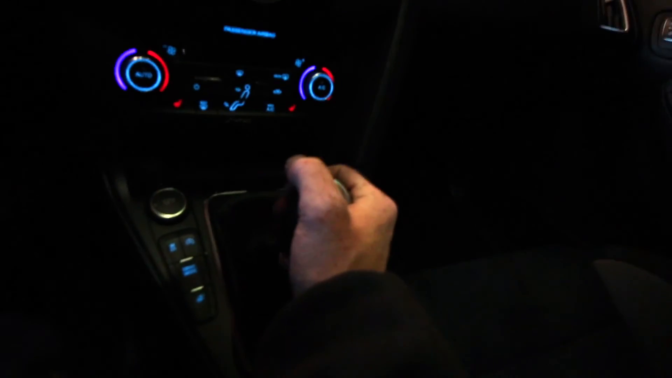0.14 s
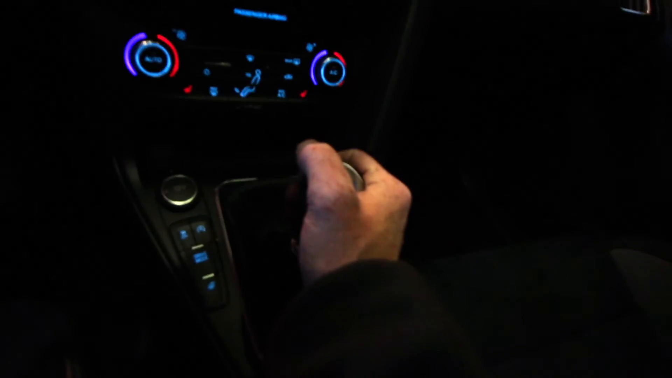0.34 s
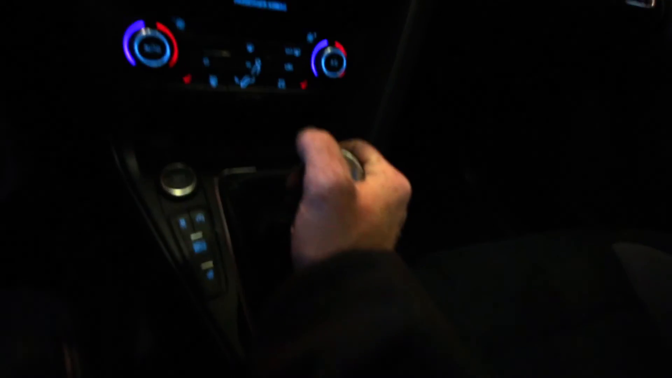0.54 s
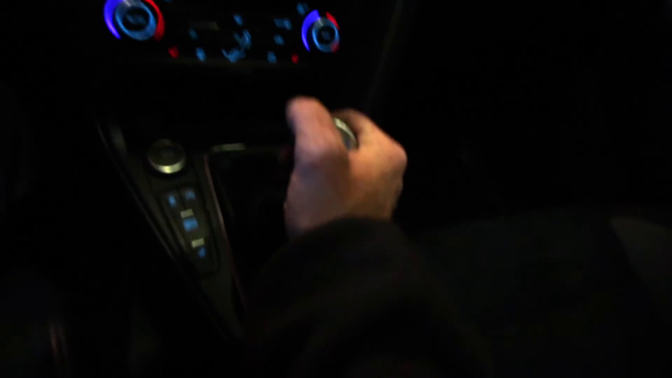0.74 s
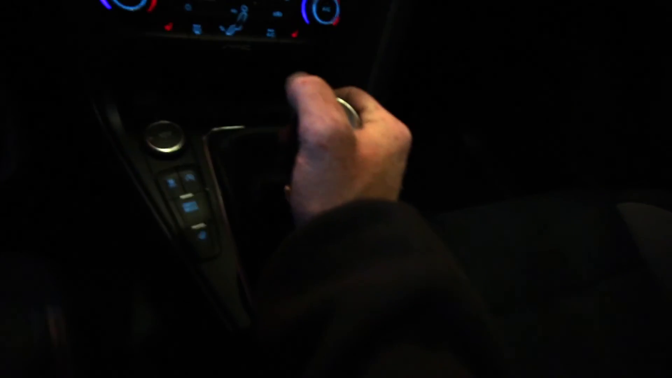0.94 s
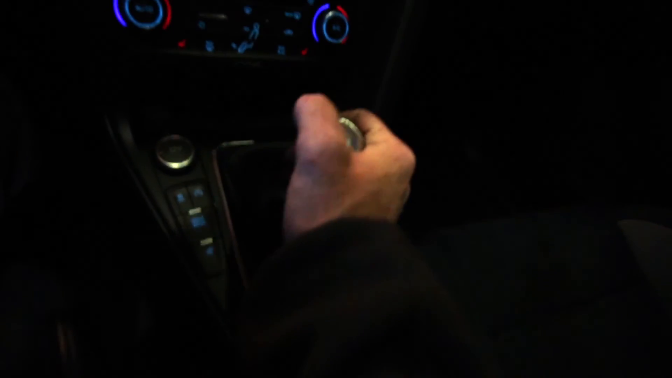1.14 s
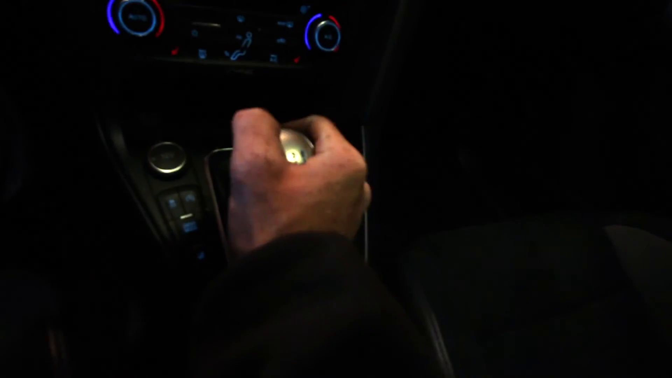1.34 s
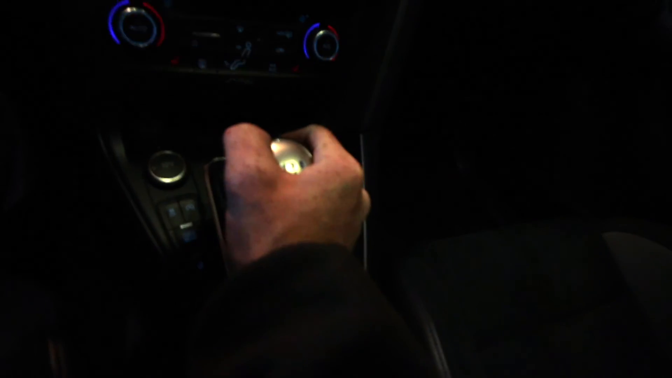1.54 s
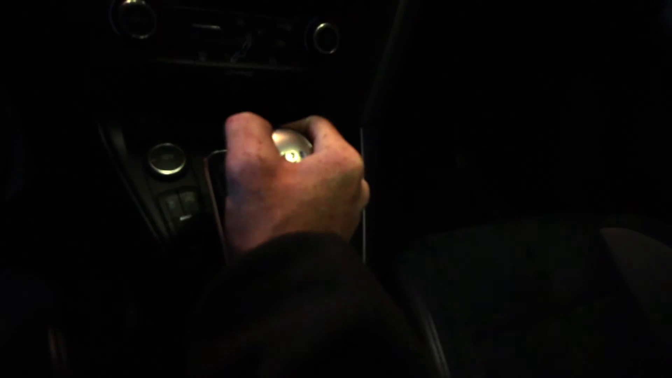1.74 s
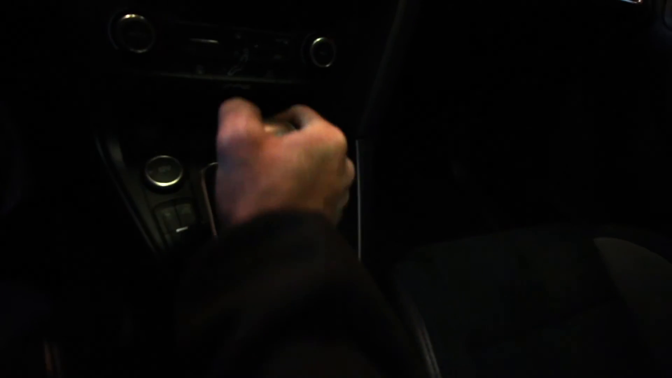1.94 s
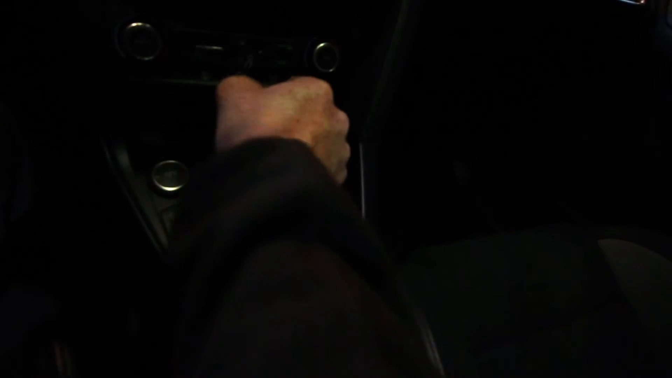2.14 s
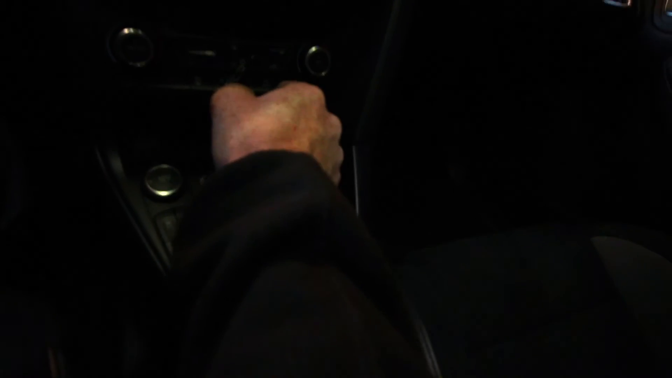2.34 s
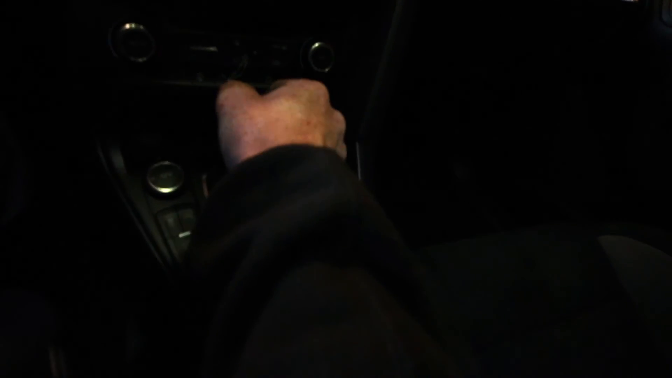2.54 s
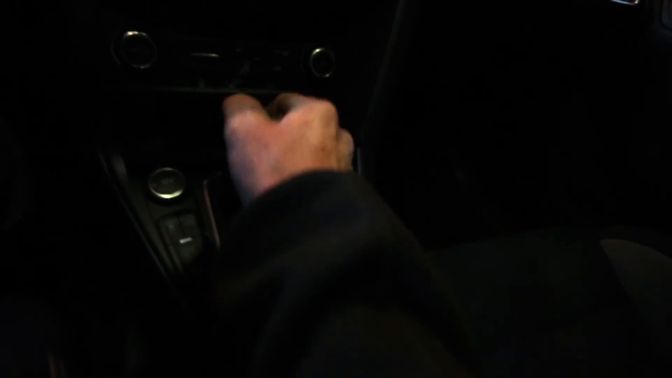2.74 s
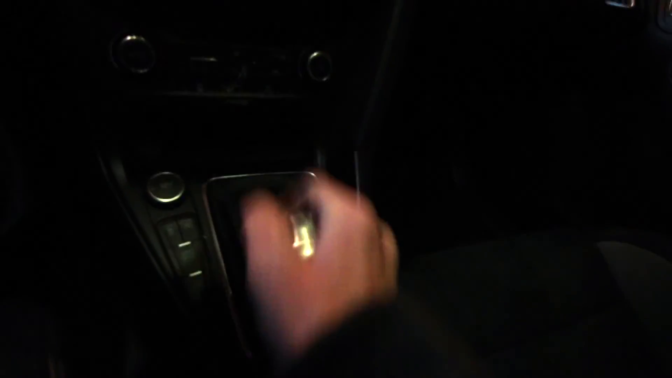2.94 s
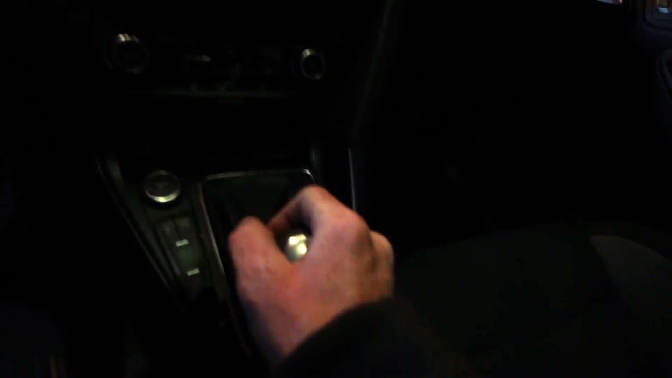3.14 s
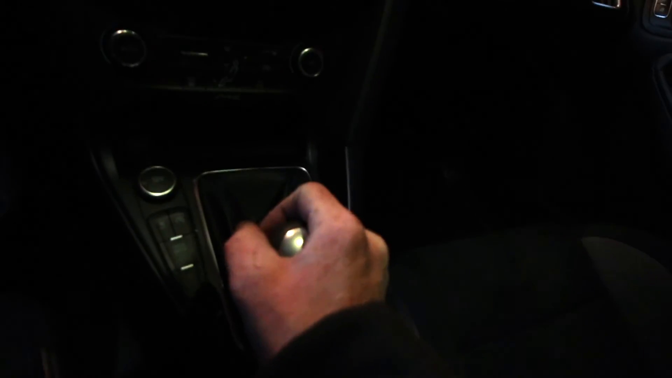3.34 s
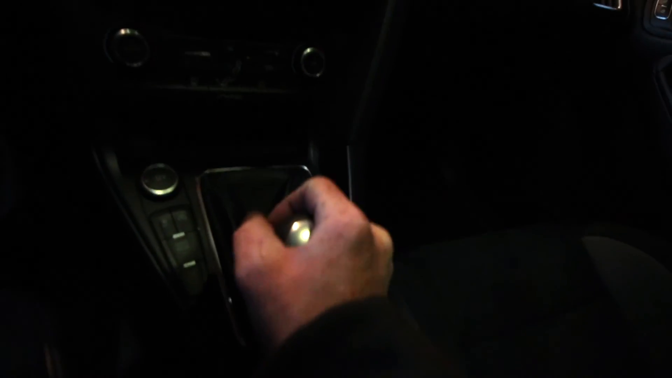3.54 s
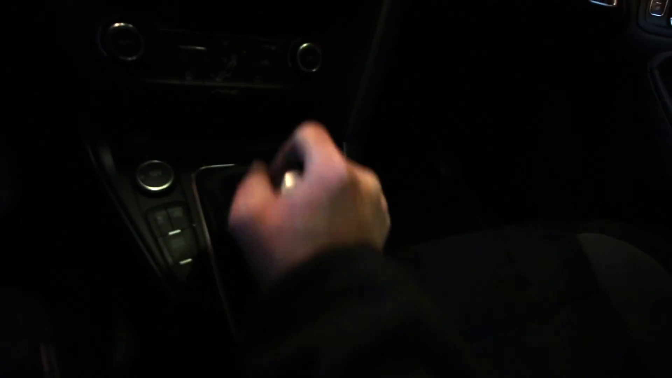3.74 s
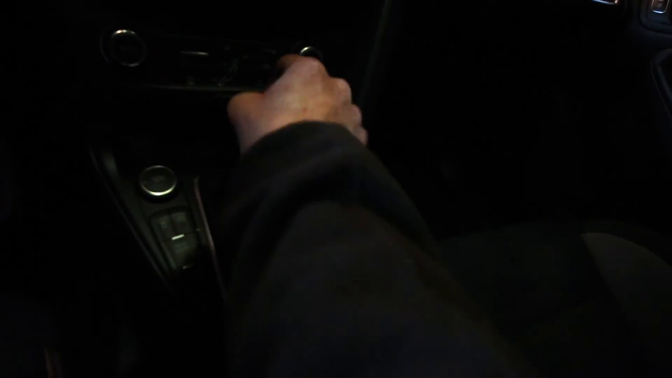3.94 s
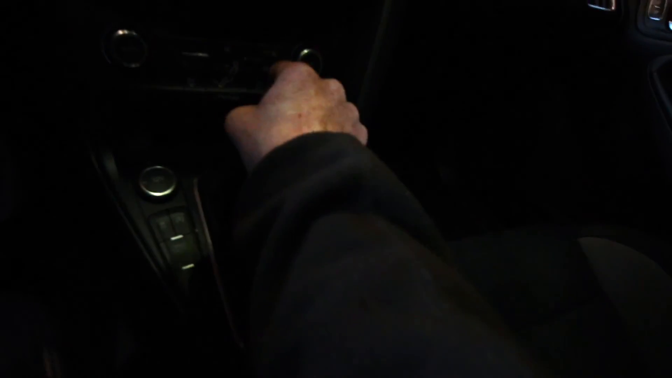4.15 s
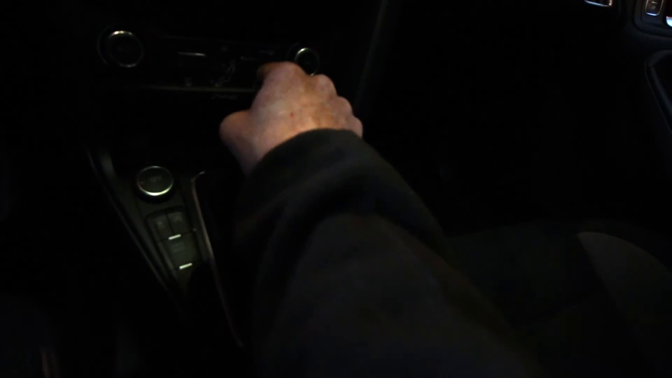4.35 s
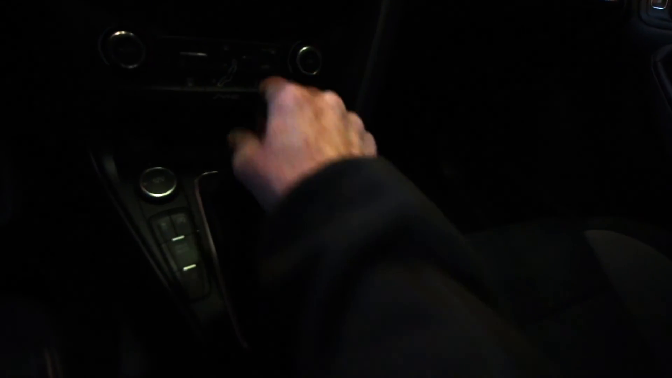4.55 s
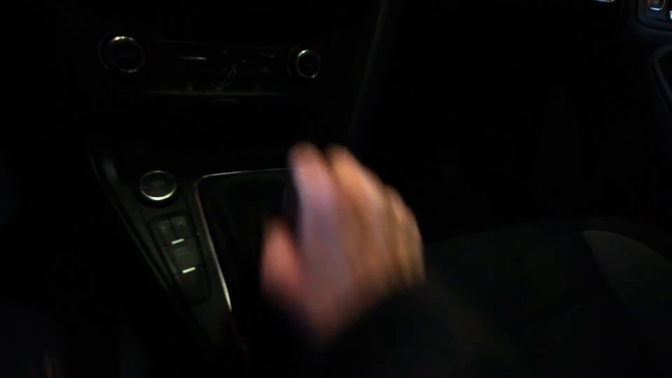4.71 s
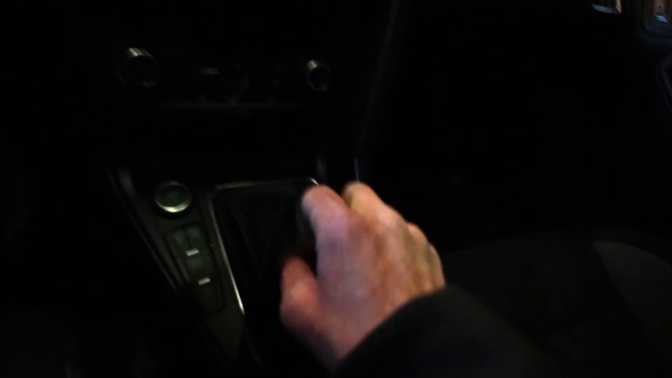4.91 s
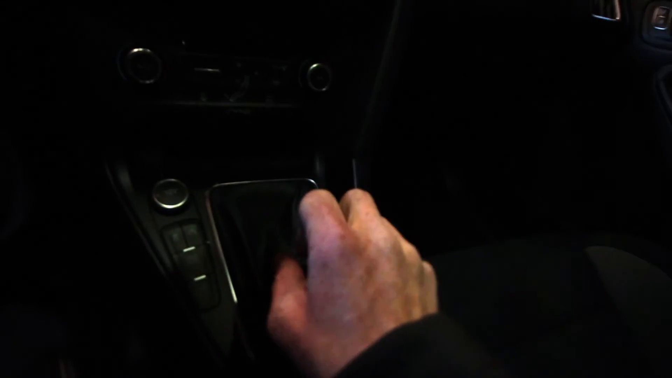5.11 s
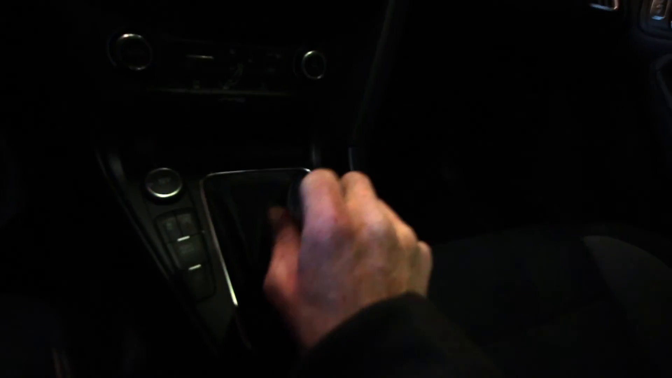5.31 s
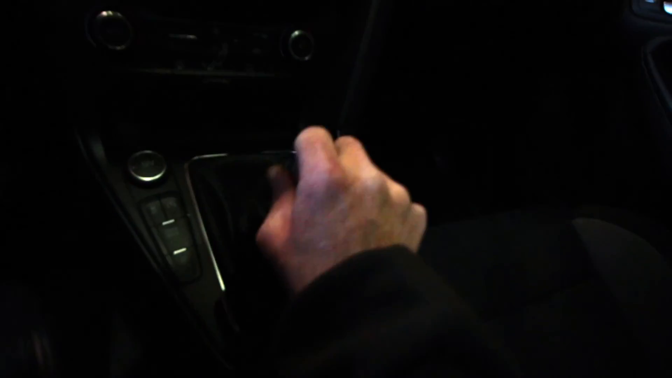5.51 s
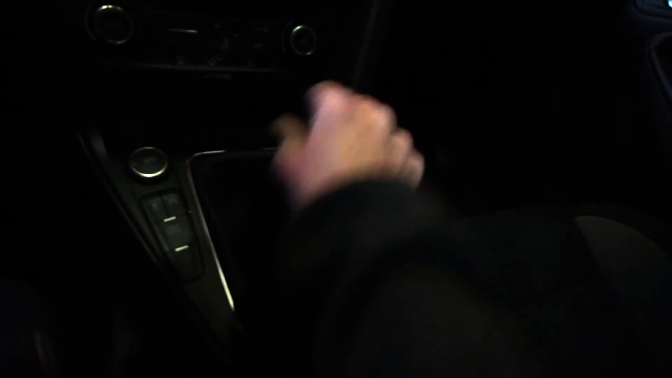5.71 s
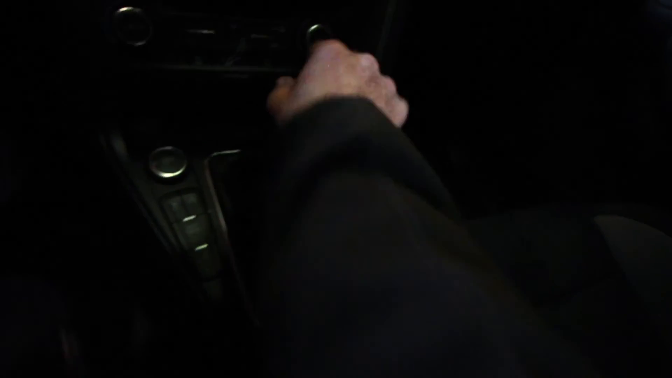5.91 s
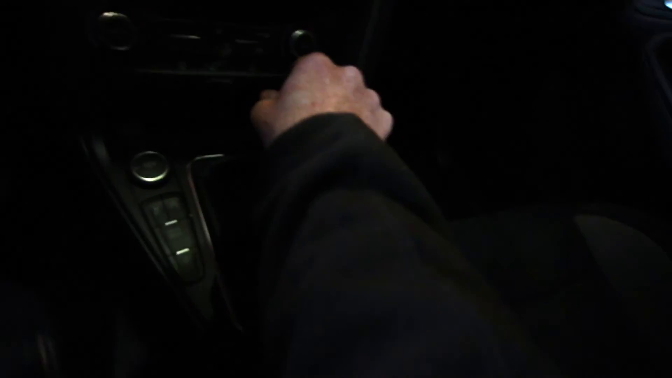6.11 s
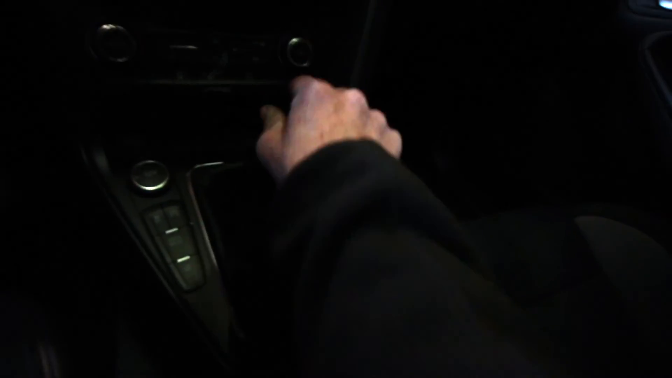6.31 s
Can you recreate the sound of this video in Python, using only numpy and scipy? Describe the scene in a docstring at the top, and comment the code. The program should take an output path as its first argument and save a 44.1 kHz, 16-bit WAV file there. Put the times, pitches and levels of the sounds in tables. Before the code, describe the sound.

A manual gear lever is heard up close in a small, echoless car cabin. It first knocks and clicks lightly in neutral, then clunks into gear five times at roughly one-second intervals. Each shift catches, thumps the console and clacks the linkage, with a dull rubbery shudder. Coat cloth and the crinkly cover around the lever rustle softly between the hits, while a quiet rumble sits underneath.

```python
"""First come a quiet rumble and the slide of a coat sleeve inside a parked car, then soft bumps and clicks
as a hand wiggles the gear lever in neutral. Five shifts follow, about a second apart. In each, the lever
hits its spring catch, its guide (the gate) and its end stop, thumping the console and clacking the rods
that link it to the gearbox, which ring on faintly. The lever shudders on its rubber mounts, the sleeve
rustles, and the boot (the soft cover around the lever) swishes as it folds."""
import sys
import numpy as np
from scipy import signal
from scipy.fft import rfft, irfft, next_fast_len
from scipy.io import wavfile
from scipy.ndimage import map_coordinates

SR = 44100
rng = np.random.default_rng(int(sys.argv[2]) if len(sys.argv) > 2 else 0)


def generate_wav(signal):
    """Clip the signal to [-1, 1] and save it as 16-bit WAV at the path in sys.argv[1]."""
    frames = np.transpose(np.atleast_2d(signal))
    scaled = np.clip(frames, -1, 1) * 32767
    pcm = np.round(scaled).astype(np.int16)
    wavfile.write(sys.argv[1], SR, pcm)


N = 280961

# Table levels are relative: the functions set how loud each layer ends up.
# Spectra, or how strong a noise is from low to high pitch: f/Hz, level/dB
CABIN_SPECTRUM = [(15, -7), (35, -8), (100, -12), (230, -14.5), (420, -21), (700, -24), (950, -26),
                  (1100, -30.5), (1280, -25), (1600, -34.5), (1830, -29), (2020, -36), (3400, -38.5),
                  (5000, -43), (15600, -45.5)]  # steady background
RUMBLE_SPECTRUM = [(15, -37), (25, -32), (36, 6), (50, 6), (90, 7), (130, 4), (200, -3.5), (400, -50.5)]  # the car's body
SLIDE_SPECTRUM = [(240, -6), (400, -6), (438, -3.5), (880, -5), (949, -6), (1230, 0.5), (1330, -4),
                  (2830, -9), (3660, -7), (4530, -15), (15000, -34.5)]  # sliding sleeve
RUSTLE_SPECTRUM = [(150, 13), (450, 3.5), (750, -1.5), (1300, 0), (2100, -4), (2700, -1.5), (3600, -4),
                   (4400, -15), (7000, -17), (15000, -33)]  # rustling sleeve
CRACK_SPECTRUM = [(300, 9), (900, 1), (1800, 9.5), (2800, -4.5), (3700, -6), (4800, -9.5), (8000, -44),
                  (15000, -43)]  # lever parts hitting and scraping
RING_SPECTRUM = [(200, 10), (480, 9), (800, 1), (1300, 3), (2100, -0.5), (2750, 4), (3100, 0.5), (3550, 4),
                 (4300, -8.5), (6500, -20), (15000, -69)]  # springs and cables
SNAP_SPECTRUM = [(300, 10.5), (900, 0.5), (1600, -6.5), (2600, -1), (3600, -11), (5200, -29), (15000, -46)]  # snapping plastic
BOOT_SPECTRUM = [(1500, -8), (4000, -0.5), (6500, -2.5), (10500, -2), (13000, -5), (15500, -9.5)]  # folding boot

# Modes, the tones a struck part rings with: f/Hz, level/dB, time to fade by 60 dB/s
CONSOLE_MODES = [(71.6, -18.5, 1), (101.6, -2, 0.18), (121.2, -1, 0.38), (165.6, 2, 0.14),
                 (192.9, -3.5, 0.18), (262.6, 3.5, 0.12), (313.5, -5.5, 0.16), (345, -1.5, 0.083)]  # centre console and cabin
LINKAGE_MODES = [(409.4, -8.5, 0.17), (459, 1.5, 0.069), (574, 4.5, 0.03), (649.4, 3.5, 0.08),
                 (772, -6.5, 0.055), (922, -2.5, 0.047), (1048, -5.5, 0.047), (1188, -4, 0.032),
                 (1426, -12, 0.069), (1822, -15.5, 0.066), (2040, -17, 0.051), (2320, -31, 0.027),
                 (3250, -29, 0.051)]  # lever housing and rods
PLASTIC_MODES = [(278, -3, 0.052), (374, 3, 0.018), (474, 0, 0.024), (674, -5, 0.012), (978, -6, 0.024),
                 (1414, -5, 0.019), (1650, -4, 0.0078), (2480, 0, 0.0045)]  # hollow plastic

# The sleeve's opening slide: t/s, level/dB
SLIDE_LEVELS = [(0.0, -58), (0.168, -67), (0.486, -55), (0.73, -64), (0.736, -58), (0.944, -65.5),
                (0.972, -61.5), (1.07, -71.5), (1.12, -65.5)]
# Hard hits of the lever and rods: t/s, clack/dB, thud/dB, crack/dB, thud f/Hz, clack f/Hz
LEVER_HITS = [(0.081, -31.5, -35, -77, 258, 475), (1.218, -28.5, -47, -48, 127, 1040),
              (1.279, -34.5, -33, -55, 269, 724), (1.397, -24, -30.5, -60, 119, 450),
              (1.83, -32.5, -39.5, -75, 258, 1060), (2.061, -27, -24, -51, 222, 1210),
              (2.075, -33, -18.5, -46, 255, 764), (2.087, -16, -30, -28, 221, 1700),
              (2.099, -9.5, -19, -38, 263, 1180), (2.116, -18, -34, -54, 170, 623),
              (2.133, -29, -28.5, -32, 137, 640), (2.756, -32, -36, -70, 277, 780),
              (2.95, -22, -27, -33, 270, 780), (2.958, -13, -22.5, -42, 149, 790),
              (3.014, -27, -18, -35.5, 270, 1390), (3.023, -14, -27, -27.5, 312, 1010),
              (3.042, -22, -17.5, -30, 187, 896), (3.057, -21.5, -25.5, -30, 135, 1220),
              (3.691, -31.5, -34, -58, 229, 961), (3.707, -29, -33.5, -45, 150, 970),
              (3.864, -24, -18.5, -41, 106, 1090), (3.894, -18.5, -19, -34.5, 155, 735),
              (3.913, -21, -41, -35.5, 132, 775), (3.949, -22, -22.5, -37, 124, 735),
              (3.963, -8.5, -29, -26.5, 145, 1050), (3.98, -21.5, -23, -31.5, 124, 726),
              (3.992, -26, -19.5, -36, 101, 780), (4.543, -32.5, -34, -60, 274, 1070),
              (4.74, -20.5, -19.5, -35, 213, 800), (4.756, -18, -28, -35, 264, 835),
              (4.799, -18.5, -21.5, -30.5, 300, 470), (4.814, -27, -30, -44, 332, 1010),
              (4.827, -16, -22, -29.5, 140, 1810), (5.769, -14, -14.5, -41, 127, 510),
              (5.781, -22, -23, -56, 113, 1060), (5.796, -18, -13, -46, 166, 775),
              (5.894, -18.5, -19.5, -35.5, 310, 760), (5.914, -31, -22.5, -34, 172, 1150),
              (6.348, -32.5, -36, -44, 289, 840)]
# Soft shudders of the rubber mounts: t/s, level/dB, f/Hz, rise/s
MOUNT_SHUDDERS = [(0.081, -27.5, 234, 0.0035), (0.15, -41, 230, 0.0056), (0.188, -34.5, 170, 0.0081),
                  (0.241, -33, 237.4, 0.011), (1.079, -34.5, 89, 0.011), (1.283, -30.5, 262, .005),
                  (1.402, -33, 121, 0.0084), (1.835, -43.5, 235, 0.031), (2.015, -28, 181, 0.015),
                  (2.05, -23.5, 169, 0.01), (2.752, -32, 269.6, .015), (2.798, -33.5, 147, 0.021),
                  (2.931, -23, 165, .005), (3.836, -32, 251.5, 0.022), (3.895, -22.5, 129, 0.023),
                  (4.547, -33.5, 271.5, 0.017), (4.589, -35, 136, 0.0088), (4.653, -36.5, 185, 0.01),
                  (4.759, -23, 273, 0.015), (4.799, -20.5, 330, 0.0066), (4.812, -19, 139.6, 0.0089),
                  (5.462, -31, 229, 0.015), (5.483, -27, 148.6, 0.014), (5.8, -7.5, 223, 0.0022),
                  (5.815, -24, 175, 0.045), (6.344, -35, 292, 0.0082)]
# Dry plastic clicks: t/s, snap/dB, knock/dB
PLASTIC_CLICKS = [(0.257, -24.5, -30.5), (0.4313, -31.5, -43), (1.1485, -21, -26.5), (1.1498, -22, -34.5),
                  (1.328, -39, -49), (1.3952, -19, -28), (1.397, -24, -31.5), (1.4004, -26, -33),
                  (2.076, -20, -28), (3.474, -41.5, -48), (5.0812, -30, -54), (5.4164, -34, -37),
                  (5.755, -14.5, -30)]
# The hand changes its grip, stirring sleeve and boot: t/s, level/dB, width/s
GRIP_MOVES = [(1.29, -59.5, 0.033), (1.487, -59, 0.044), (1.895, -62, 0.064), (2.24, -64, 0.01),
              (3.33, -63.5, .011), (3.437, -67, .015), (3.764, -57, 0.086), (4.935, -60, 0.013),
              (5.156, -65, 0.045), (5.496, -63, 0.026), (6.047, -59, .018), (6.32, -59, 0.046)]
# A shift pulls out of gear, meets the gate, then seats (drops into the next gear):
# seat t/s, pull lead/s, gate lead/s, arm travel/dB, arm push/dB,
# boot at pull/dB, boot at gate/dB, boot at seat/dB, car sway/dB, sway delay/s
GEAR_SHIFTS = [(2.142, .16, 0.04, -59.5, -48, -52.5, -52.5, -48, -24, 0.0043),
               (3.04, 0.21, 0.082, -76, -40, -55.5, -47, -40.5, -28, 0.012),
               (3.99, 0.34, 0.097, -57, -50, -69, -53, -50.5, -23.5, 0.014),
               (4.83, 0.21, 0.081, -59.5, -51, -48, -47, -43, -27.5, 0.0078),
               (5.913, 0.51, 0.14, -52.5, -58, -61, -46.5, -45, -27, 0.035)]


def amp(db):
    """Turn decibels into a factor to multiply by."""
    return 10 ** (np.asarray(db) / 20)


def unit(x):
    """Scale x to an average (rms) level of 1."""
    return x / np.sqrt(np.mean(x ** 2) + 1e-20)


def gains(spectrum, size):
    """A spectrum's gain at each frequency of a sound that is size samples long."""
    hz, db = np.transpose(spectrum)
    return amp(np.interp(np.log(np.fft.rfftfreq(size, 1 / SR) + 1), np.log(hz + 1), db))


def curve(rows):
    """Join (t/s, level/dB) points into one level per sample, sinking to silence outside them."""
    s, db = np.transpose(rows)
    return np.interp(np.arange(N) / SR, np.r_[s[0] - .3, s, s[-1] + .3], np.r_[-100, db, -100])


def wobble(rate):
    """A smooth curve through rate random points a second."""
    points = rng.standard_normal(int(N * rate / SR) + 4)
    return map_coordinates(points, [np.arange(N) * rate / SR])


def noise(spectrum, size):
    """Noise of level 1 with the given spectrum."""
    padded = next_fast_len(size + 8192)
    white = rfft(rng.standard_normal(padded))
    return unit(irfft(white * gains(spectrum, padded), padded)[:size])


def impulse(spectrum, size=2048):
    """The shortest pulse with the given spectrum, peak 1."""
    cepstrum = irfft(np.log(gains(spectrum, size)))
    # folding the second half onto the first packs the energy at the pulse's start
    cepstrum[1:size // 2] *= 2
    cepstrum[size // 2 + 1:] = 0
    pulse = irfft(np.exp(rfft(cepstrum)))
    return pulse / np.abs(pulse).max()


def chatter(spectrum, size, rate):
    """Tiny random hits, about rate a second, at level 1."""
    hits = rng.standard_normal(size) * (rng.random(size) < rate / SR)
    return unit(signal.fftconvolve(hits, impulse(spectrum))[:size])


def fade(t, t60):
    """Die away by 60 dB every t60 seconds."""
    return np.exp(-np.log(1000) * t / t60)


def swell(start, end, rise, fall):
    """Reach full level at start, hold until end, then fade; rise and fall are seconds per 60 dB."""
    t = np.arange(N) / SR
    return fade(np.maximum(start - t, 0), rise) * fade(np.maximum(t - end, 0), fall)


def favour(modes, hz, depth_db, octaves):
    """Where a blow lands favours the modes near one pitch: turn the others down, in dB."""
    apart = np.log2(np.array(modes)[:, :1] / hz)
    return depth_db * (np.exp(-(apart / octaves) ** 2) - 1)


def struck(modes, t, scatter_db, detune, favour_db=0):
    """Fading tones of a struck part; each blow lands differently and the grip shifts their tuning."""
    hz, db, t60 = np.transpose(modes)[:, :, None]
    strength, shift = rng.standard_normal((2, len(modes), 1))
    sign = (-1) ** np.arange(len(modes))[:, None]
    gain = sign * amp(db + favour_db + scatter_db * strength)
    tones = np.sin(2 * np.pi * hz * (1 + detune * shift) * t)
    return np.sum(gain * fade(t, t60) * tones, axis=0)


def add(track, s, sound):
    """Mix a sound into the track at s seconds."""
    part = track[max(round(s * SR), 0):][:len(sound)]
    part += sound[:len(part)]


def grips():
    """How strongly the hand stirs the cloth: one smooth hump for each change of grip."""
    t = np.arange(N) / SR
    return sum(amp(db) * np.exp(-.5 * ((t - s) / width) ** 2) for s, db, width in GRIP_MOVES)


def cabin():
    """A quiet background, and a slowly settling rumble that swells as each shift rocks the car."""
    settle_db_per_s, hold_s = 1.87, 0.024
    resting = amp(-47.5 - settle_db_per_s * np.arange(N) / SR + 4.8 * wobble(17))
    rocking = sum(amp(sway_db - 6) * swell(seat + delay, seat + delay + hold_s, rise=0.3, fall=0.5)
                  for seat, *_, sway_db, delay in GEAR_SHIFTS)
    background = amp(-52) * noise(CABIN_SPECTRUM, N)
    return background + np.hypot(resting, rocking) * noise(RUMBLE_SPECTRUM, N)


def sleeve():
    """Coat cloth slides as the arm settles, then rustles as the arm travels and pushes each gear home."""
    rise_s, fall_s = 0.71, 0.59
    slide = amp(curve(SLIDE_LEVELS) + 9.5 + 0.5 * wobble(38.4)) * noise(SLIDE_SPECTRUM, N)
    power = (amp(0.5) * grips()) ** 2
    for seat, pull_lead, gate_lead, travel_db, push_db, *_ in GEAR_SHIFTS:
        pull, gate = seat - pull_lead, seat - gate_lead
        power += (amp(travel_db) * swell(pull, seat, rise_s, fall_s)) ** 2
        power += (amp(travel_db + 7) * swell(gate - 0.03, gate, rise_s, fall_s)) ** 2
        power += (amp(push_db) * swell(seat, seat, rise=0.47, fall=fall_s)) ** 2
    flutter = amp(4 + 2.55 * wobble(40))
    return slide + np.sqrt(power) * flutter * noise(RUSTLE_SPECTRUM, N)


def lever():
    """Each hit scrapes in, thumps the console, clacks the rods and leaves a faint metallic ring."""
    bounce_s, bounce_loss_db = 0.011, 5.5
    out, t = np.zeros(N), np.arange(int(0.6 * SR)) / SR
    brief, countdown = t[:SR // 8], t[:SR // 16][::-1]
    # rubber softens the start of the thud; grease blunts the clack a little
    rubber = 1 - np.exp(-t / 0.00054)
    grease = 1 - np.exp(-brief / 0.00043)
    for s, clack_db, thud_db, crack_db, thud_hz, clack_hz in LEVER_HITS:
        focus_db = 7.5 + 0.22 * max(-33 - clack_db, 0)  # a light touch rings mostly the part it lands on
        thud_tilt = favour(CONSOLE_MODES, thud_hz, depth_db=6.5, octaves=0.57)
        clack_tilt = favour(LINKAGE_MODES, clack_hz, depth_db=focus_db, octaves=0.13)
        thud = rubber * struck(CONSOLE_MODES, t, scatter_db=1.2, detune=0.012, favour_db=thud_tilt)
        for bounce in range(3):  # the hit itself, then two weaker bounces
            clack = struck(LINKAGE_MODES, brief, scatter_db=1.8, detune=0.008, favour_db=clack_tilt)
            delay = bounce * bounce_s * rng.uniform(0.7, 1.3)
            add(out, s + delay, amp(clack_db - 7 - bounce * bounce_loss_db) * grease * clack)
        crack = chatter(CRACK_SPECTRUM, len(t), rate=1500) * fade(t, 0.07)
        # the many close tones of springs and cables blur into a dying hiss
        ring = noise(RING_SPECTRUM, len(t)) * fade(t, 0.45) * (1 - np.exp(-t / 0.0083))
        add(out, s, amp(thud_db - 2.5) * thud + amp(crack_db - 2) * crack + amp(crack_db - 7) * ring)
        # just before the hit, the spring catch scrapes up its ramp
        scrape = chatter(CRACK_SPECTRUM, len(countdown), rate=1300) * fade(countdown, 0.042)
        add(out, s - countdown[0], amp(clack_db - 20.5) * scrape)
    return out


def shudders():
    """Pressed on its rubber mounts or tugged by a skidding palm, the lever shakes with a dull rub."""
    out, t = np.zeros(N), np.arange(SR // 6) / SR
    skid_start_s, slip_gap_s, slip_hz, slip_rise_s = 0.285, 0.031, 190, 0.0047
    # the palm slips on the knob four times, each a little weaker
    slips = [(skid_start_s + k * slip_gap_s, -32 - 0.2 * k, slip_hz, slip_rise_s) for k in range(4)]
    rub_spectrum = [(60, -44), (130, 9.5), (330, 4), (600, -9), (1200, -18), (2500, -22.5), (6000, -44.5)]
    for s, db, hz, rise in MOUNT_SHUDDERS + slips:
        bulge = t / rise * np.exp(1 - t / rise)
        pitch_drift = 0.094 * noise([(30, -5), (150, -48)], len(t))
        shake = np.sin(2 * np.pi * np.cumsum(hz * (1 + pitch_drift)) / SR)
        rub = noise(rub_spectrum, len(t))
        add(out, s, amp(db - 0.5) * bulge * (shake + 0.38 * rub))
    return out


def clicks():
    """Loose plastic parts meet with one sharp snap, a brief rattle and a hollow knock."""
    out, t = np.zeros(N), np.arange(SR // 8) / SR
    snap = impulse(SNAP_SPECTRUM, size=len(t))
    for s, snap_db, knock_db in PLASTIC_CLICKS:
        rattle = chatter(SNAP_SPECTRUM, len(t), rate=2600) * fade(t, 0.065)
        knock = struck(PLASTIC_MODES, t, scatter_db=1, detune=0.03)
        add(out, s, amp(snap_db) * (snap + amp(-15) * rattle) + amp(knock_db + 4.5) * knock)
    return out


def boot():
    """The boot folds with a fine, crinkly swish at each change of grip and each pull, gate and seat."""
    folding = grips()
    for seat, pull_lead, gate_lead, _, _, pull_db, gate_db, seat_db, *_ in GEAR_SHIFTS:
        pull, gate = seat - pull_lead, seat - gate_lead
        folding += amp(pull_db) * swell(pull, pull, rise=0.15, fall=0.072)
        folding += amp(gate_db) * swell(gate, gate, rise=0.25, fall=0.19)
        folding += amp(seat_db) * swell(seat, seat, rise=0.15, fall=0.11)
    creases = unit(amp(2.4 * wobble(350) + 0.5 * wobble(70)))
    return amp(-2.5) * folding * creases * noise(BOOT_SPECTRUM, N)


def scene():
    """All the sounds in one channel, close by, in a small cabin with no echo."""
    return (lever() + shudders() + clicks() + sleeve() + boot() + cabin())[None]


def record(dry):
    """Cut away the very highest treble."""
    top_hz, padded = 15780, next_fast_len(N + 8192)
    passband = np.fft.rfftfreq(padded, 1 / SR) < top_hz
    return irfft(rfft(dry, padded) * passband, padded)[..., :N]


dry = scene()
out = record(dry)
generate_wav(out)
```